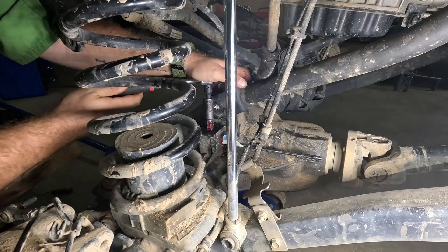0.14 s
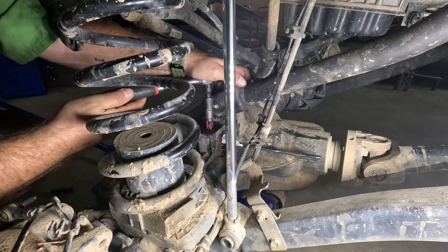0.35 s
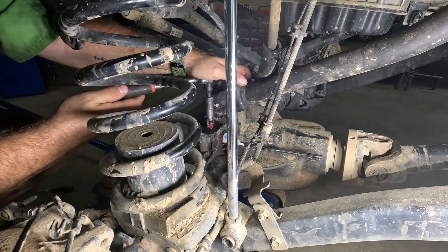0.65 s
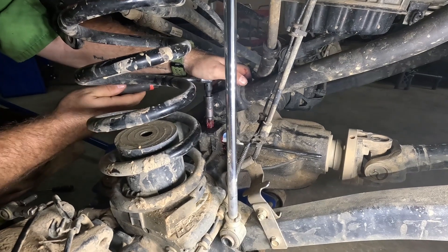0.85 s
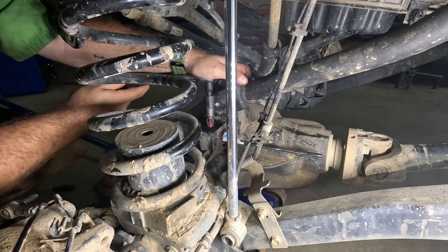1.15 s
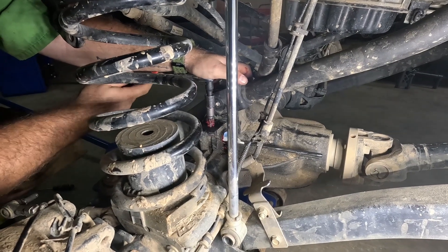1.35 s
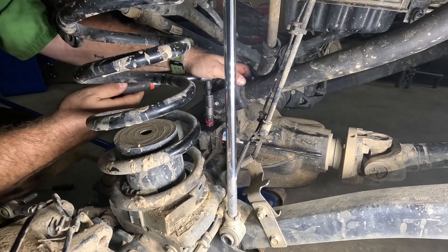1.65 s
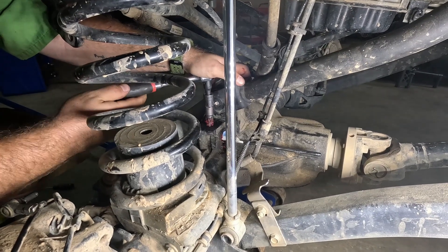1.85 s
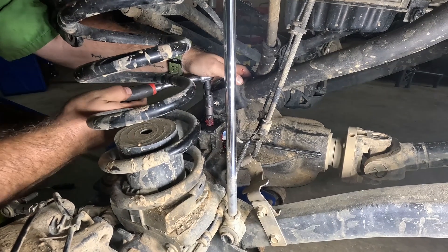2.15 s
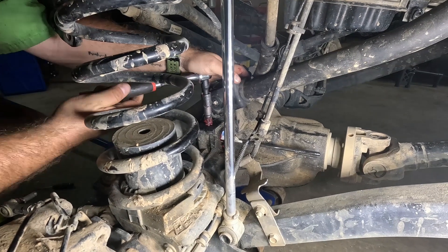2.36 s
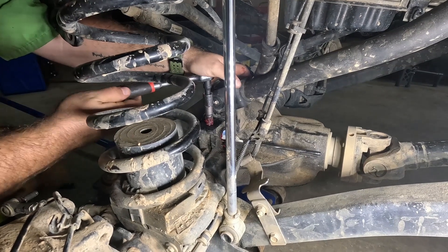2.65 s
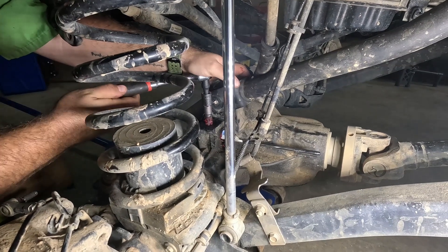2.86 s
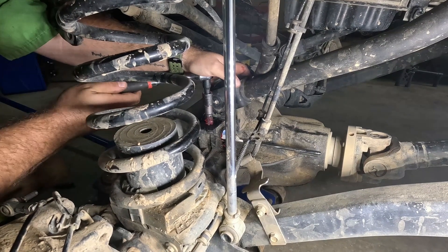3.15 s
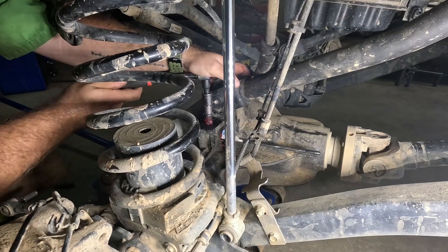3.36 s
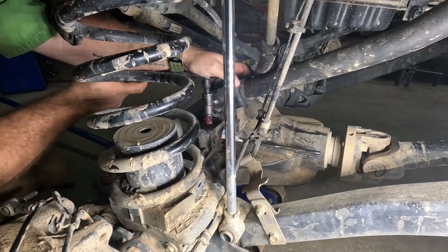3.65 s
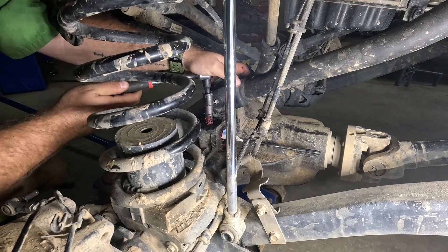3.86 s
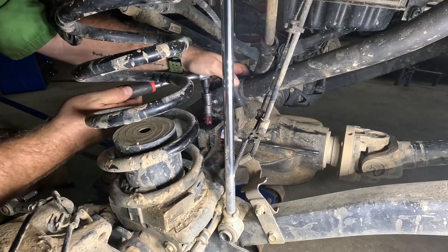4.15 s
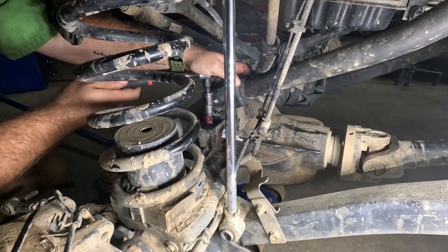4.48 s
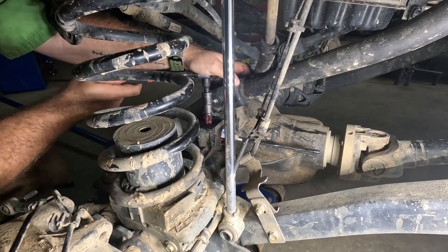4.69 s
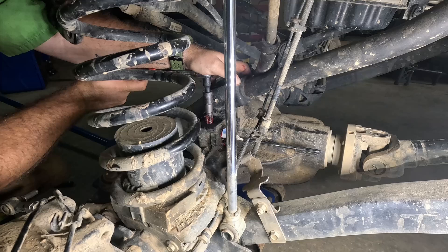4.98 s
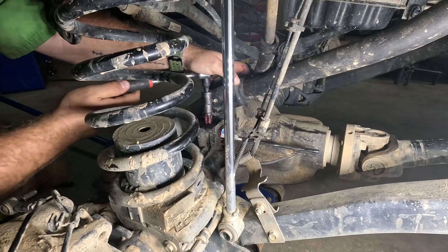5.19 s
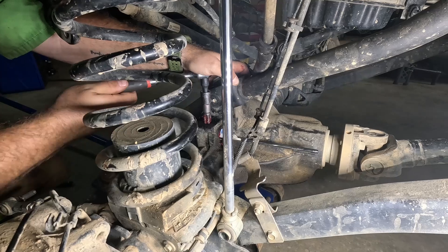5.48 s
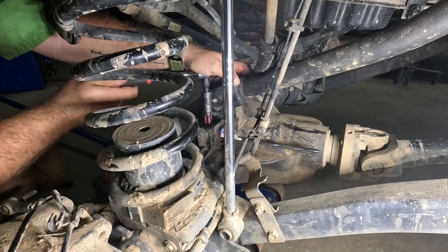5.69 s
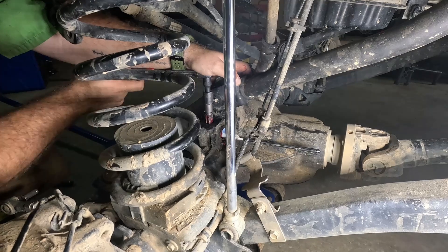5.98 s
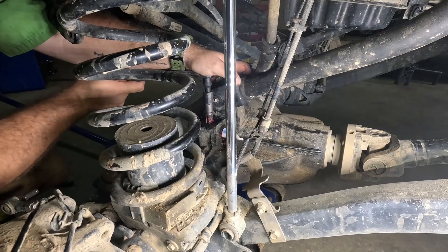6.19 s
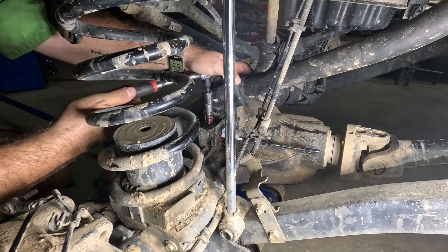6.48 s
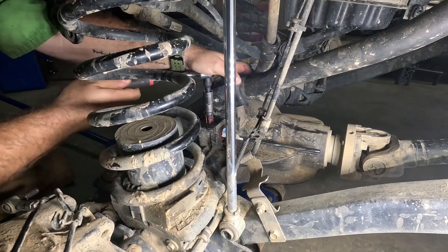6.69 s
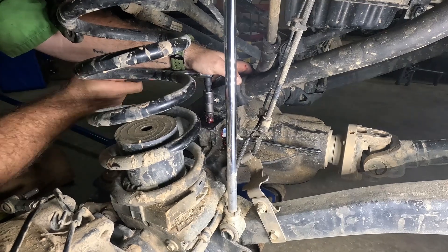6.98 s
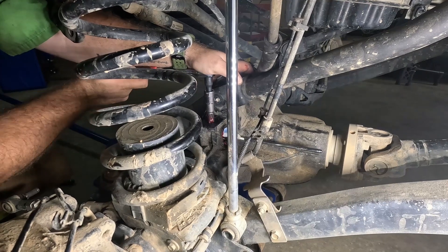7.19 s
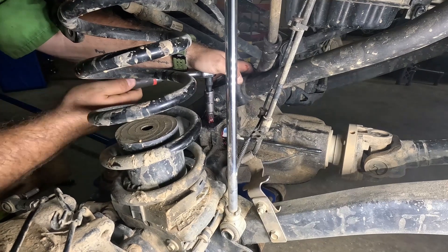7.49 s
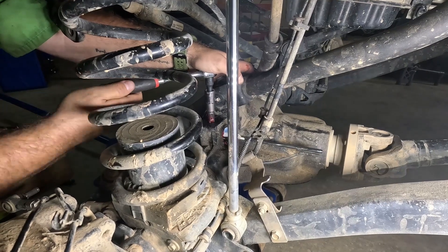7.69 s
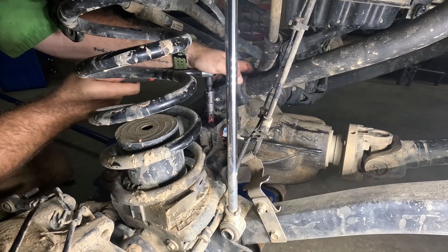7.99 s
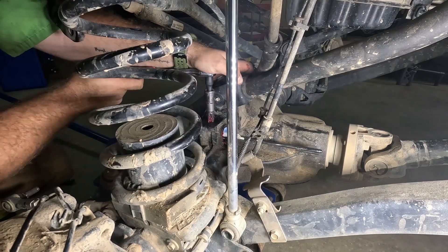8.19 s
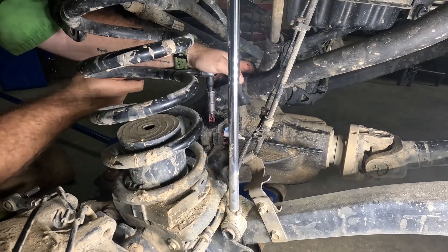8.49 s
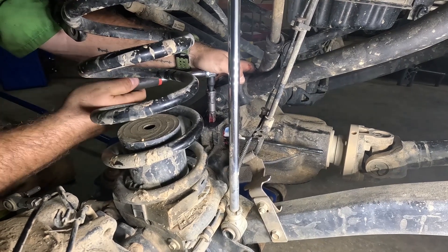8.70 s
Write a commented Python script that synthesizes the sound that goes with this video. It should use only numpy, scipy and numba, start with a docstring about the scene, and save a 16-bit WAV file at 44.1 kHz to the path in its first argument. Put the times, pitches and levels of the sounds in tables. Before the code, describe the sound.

Sharp, dry steel clicks run in bursts of five to seven, each lasting a fraction of a second, as a ratchet is swung back. Between bursts the cutting tool hisses softly with barely audible thin squeaks, joints knock, and hands rustle. A rough handle scrape interrupts the long gap after the second burst. The microphone is near, in stereo, with modest garage reverberation, steady faint hiss and drifting low rumble.

```python
"""In a quiet garage, under a vehicle, a ratchet wrench on a long extension turns a thread tap.
On back strokes the pawl drags over the gear teeth and drops off with clicks: ringing steel plus noise.
Slack joints knock softly, the socket taps the frame; the cutting tap hisses in noise bands, with thin squeaks.
Hands rustle and bump in grainy noise, and the handle scrapes once. The walls return a diffuse tail.
Air hiss, rumble and far machinery are filtered noise that drifts in level."""
import sys
import numpy as np
from scipy import signal
from scipy.fft import rfft, irfft
from scipy.io import wavfile
from scipy.ndimage import uniform_filter1d
from numba import njit

SR = 44100
rng = np.random.default_rng(int(sys.argv[2]) if len(sys.argv) > 2 else 0)


def digitize_waveform(pressure):
    """Quantize a signal to 16-bit integers and store it at the path in sys.argv[1].

    Rows of a 2-D input are taken as channels; values are limited to [-1, 1].
    """
    field = np.atleast_2d(pressure).T
    bounded = np.clip(field, -1, 1)
    quanta = np.round(bounded * 32767).astype(np.int16)
    wavfile.write(sys.argv[1], SR, quanta)


N = 389844

# Pawl dropping off a tooth. Each row: start in seconds, level in dB, boost of the low ring of the
# extension shaft in dB, boost of the high ring of the head in dB, rebound level in dB.
PAWL_CLICKS = [(0.158, -28, 2.5, 5.5, -19), (0.187, -27, 2, 5.5, -8.5), (0.2186, -25.5, 2, 8.5, -12),
               (0.2546, -29, 6.5, 3.5, -11), (0.2958, -30, 10, 8, -8), (0.3424, -28, 12, 11, -6),
               (0.388, -26, 0.5, 5.5, -23), (1.5637, -27, 5, 6.5, -22), (1.5994, -28, 2.5, 3, -8.5),
               (1.6371, -26, 2, 7.5, -12), (1.6931, -30.5, 6.5, 6, -14), (1.7548, -29, 6.5, 2.5, -10),
               (1.8445, -29.5, 3, 9.5, -21), (3.8096, -34.5, 15.5, 10, -16), (3.819, -26.5, 9.5, 14, -21),
               (3.8739, -26.5, 2.5, 3, -27), (3.901, -27, 6.5, 9.5, -21), (3.9375, -27.5, 6.5, 10.5, -28),
               (3.9821, -29, 5, 8.5, -12), (4.0299, -26, 7.5, 13.5, -19), (5.1291, -29.5, 16.5, 14.5, -3.5),
               (5.1815, -27, 9.5, 10.5, -18), (5.209, -28, 10.5, 11.5, -8), (5.2344, -26.5, -2, 7.5, -21),
               (5.2622, -29, 8, 7.5, -13), (5.2944, -29, 11.5, 11.5, -11), (5.3348, -32, 8, 7, -25),
               (6.298, -43, 4, 11, -20), (6.341, -29, 9.5, 10, -8), (6.366, -26.5, 9.5, 13, -14),
               (6.3897, -26, 7.5, 10, -25), (6.4132, -28.5, 6.5, 7.5, -12), (6.44, -26.5, 8.5, 8.5, -22),
               (6.4767, -28, 12.5, 9.5, -25), (7.422, -42.5, 19, 6, -11), (7.4644, -30, 10, 10.5, -16),
               (7.4898, -29, 10, 9.5, -7), (7.5176, -27, 7, 8.5, -20), (7.5469, -28.5, 9, 9, -10),
               (7.5793, -25.5, 8.5, 11, -19), (7.6132, -42.5, 10, 14, -14), (8.5606, -39, 6, 6, -20),
               (8.6034, -29, 12.5, 6.5, -13), (8.625, -28, 11, 10, -11), (8.6457, -27.5, 15, 14.5, -18),
               (8.6688, -26.5, 10.5, 10, -25), (8.6927, -25.5, 12, 9, -28), (8.7275, -36.5, 20, 12.5, -17)]
# Back strokes, the pawl dragging up the tooth flanks between clicks. Each row: start in seconds,
# length in seconds, drag level in dB, extra crispness of the stroke's clicks in dB.
BACK_STROKES = [(0.128, 0.34, -63, -0.5), (1.53, 0.38, -65.5, 1), (3.775, 0.36, -66, -1.5),
                (5.103, 0.25, -56.5, 3), (6.27, 0.19, -57.5, 0), (7.404, 0.33, -67, 0.5),
                (8.536, 0.24, -63, 1.5)]
# Ringing of the wrench and extension. Each row: pitch in Hz, strength in dB,
# time to fade by 60 dB in seconds (before the damping of each blow).
STEEL_MODES = [(1045, -39, 0.1), (1318, -26.5, 0.11), (1585, -23, 0.085), (1820, -20.5, 0.089),
               (2144, -20, 0.072), (2574, -20, 0.11), (2955, -9.5, 0.089), (3305, 6, 0.03),
               (3518, 1, 0.044), (3763, 5, 0.019), (4274, -3.5, 0.045), (4536, -5, 0.058), (5133, 0, 0.044),
               (5430, -3, 0.021), (5845, -9, 0.048), (6270, -5, 0.048), (7147, -1, 0.036),
               (7476, 1.5, 0.019), (7570, -4.5, 0.015), (8740, -8, 0.024), (8760, -9, 0.042),
               (9370, -9.5, 0.058), (10160, -10.5, 0.054), (11960, -16, 0.031), (13600, -18, 0.019)]
# Spectrum of the rattle of small parts. Each row: frequency in Hz, relative level in dB per Hz.
RATTLE_SPECTRUM = [(500, -46), (1000, -37), (1600, -22.5), (2600, -14.5), (3500, 5), (4400, -1.5),
                   (5300, 3), (6300, -10.5), (7200, -1), (8600, -18.5), (10200, -14.5), (12000, -21),
                   (16000, -42.5)]
# Slack in the joints taken up. Each row: start in seconds, level in dB, brightest frequency in Hz,
# damping as a factor, left minus right in dB.
JOINT_KNOCKS = [(0.0962, -53.5, 1340, 0.56, -2), (0.109, -53.5, 1420, 1.4, 1), (0.588, -60.5, 2860, 1.2, 2),
                (0.6683, -64.5, 1330, 1.8, 7), (1.4683, -56.5, 3800, 0.2, 0), (1.4903, -59, 1020, 0.48, -1),
                (2.1962, -53, 6140, 2.3, 1), (2.3037, -64, 2900, 1.3, 9), (2.4287, -52.5, 2800, 1.7, 14),
                (2.5566, -50, 3530, 1.2, 4), (2.7226, -58, 1630, 1.7, 7), (4.07, -51, 4500, 1.7, 2),
                (4.2246, -56.5, 3100, 0.78, 0), (4.247, -60, 5000, 1.5, 2.5), (4.9184, -64, 3020, 0.49, 3),
                (5.0962, -58.5, 1780, 1.5, 2), (5.4828, -60.5, 1920, 0.24, 0),
                (5.519, -52.5, 5650, 1.9, -1), (5.5597, -52.5, 2050, 1.04, 0), (6.2507, -60, 3500, 1.5, 4),
                (6.7403, -61, 1620, 0.58, 0), (7.3762, -58.5, 1860, 0.65, -1), (7.7686, -55, 2100, 0.27, 0),
                (8.531, -66, 1310, 1.1, 0)]
KNOCK_OCTAVES = 0.92  # spread of the steel that a knock wakes: 6 dB down this far from the brightest
# Socket tapping the frame beside the hole. Each row: start in seconds, level in dB,
# boost of the low ring in dB, left minus right in dB.
SOCKET_TAPS = [(2.687, -42, 9, 2), (2.789, -62, 18, 3), (3.0976, -47, 17.5, -1), (7.667, -47, 11, 1),
               (8.0055, -51.5, 8.5, 0), (8.403, -58, 1, 4), (8.573, -52, 25, 4)]
# Ringing of the frame. Each row: pitch in Hz, strength in dB,
# time to fade by 60 dB in seconds (before the damping of each blow).
FRAME_MODES = [(1143, -23, 0.33), (1305, -15, 0.23), (1624, -16.5, 0.23), (2172, -13.5, 0.19),
               (2624, 3, 0.14), (2926, 12.5, 0.061), (3660, -6, 0.057), (4260, -11, 0.28)]
# The two microphone ports, level. Each row: frequency in Hz, left minus right in dB.
PORT_LEVEL = [(60, -1.5), (110, -1.0), (200, -1.5), (380, -2.5), (700, -2.5), (1290, 0.5), (2380, -1.0),
              (4400, 0.0), (8120, 2.0), (15000, 3.0)]
# The two microphone ports, timing. Each row: frequency in Hz, lead of the left in radians.
# On the log axis of read(), the second row's value also holds below it.
PORT_LEAD = [(0, 0), (1640, -0.5), (2150, -0.2), (3010, -0.6), (4310, -0.3), (6890, -0.3), (7490, -0.5),
             (7920, -0.3), (10800, -0.2), (11700, 0.1), (12300, -0.0), (13300, 0.1), (15400, 0.3),
             (16200, -2.8)]
# Hissing bites of the cutting tap, and faint thin squeaks (the narrow rows). Each row: start in seconds,
# length in seconds, first centre in Hz, top centre in Hz, level at full size in dB, width at full size in Hz.
BITES_AND_SQUEAKS = [(1.007, 0.3, 3350, 4570, -59.5, 700), (1.28, 0.26, 3970, 4470, -61, 1000),
                     (2.64, 0.33, 4880, 4860, -77, 80), (3.624, 0.17, 4900, 4820, -76, 80),
                     (5.993, 0.3, 3460, 4440, -59.5, 596), (6.058, 0.052, 3100, 3120, -66, 500),
                     (7.174, 0.07, 3280, 3230, -73, 700), (7.685, 0.24, 4130, 4700, -58.5, 600),
                     (8.007, 0.3, 4660, 4830, -61.5, 600), (8.457, 0.063, 2140, 2120, -78, 60),
                     (8.74, 0.08, 2180, 2140, -75, 60), (8.81, 0.033, 2060, 2070, -63, 150)]
# Each of them swells while it glides, then eases off and narrows.
CLIMB_HZ_PER_S, SWELL_S = 11400, 0.028  # speed of the climb, shortest time to swell
START_DB, EASE_DB_PER_S = -15.5, -67  # start level against full size, change after it
NARROW_S = 0.27  # time after full size until the width has halved
THIN_HZ = 400  # bands narrower than this ease off more slowly
# Hands and sleeves shifting on the tool and frame. Each row: time of the peak in seconds,
# rustle level in dB, dull bump level in dB, fade time in seconds.
HAND_SHIFTS = [(0.1, -68.5, -69.5, 0.26), (0.27, -60.5, -82, 0.056), (0.59, -72, -71, 0.13),
               (1.62, -70.5, -76, 0.22), (1.91, -89, -75, 0.05), (2.12, -63.5, -66, 0.09),
               (2.235, -67, -68, 0.085), (2.35, -60.5, -67, 0.24), (2.56, -62, -67, 0.14),
               (2.75, -70, -75.5, 0.41), (3.08, -77, -77, 0.23), (3.54, -77, -74, 0.083),
               (3.81, -67.5, -70, 0.055), (5.13, -61.5, -62, 0.086), (5.6, -83, -68, 0.019),
               (6.3, -69, -74, 0.09), (6.82, -92, -75.5, 0.083), (7.0, -86, -74.5, 0.23),
               (7.375, -83, -72, 0.14), (7.62, -67, -80, 0.075), (7.8, -75, -71.5, 0.23),
               (8.23, -79.5, -79, 0.19), (8.56, -64.5, -69, 0.16)]
SHIFT_RISE_S = .025
REST_RUSTLE_DB, REST_BUMP_DB = -85.5, -79  # hands at rest
# Handle scraping on the suspension. Each row: time in seconds, level in dB,
# brightness in dB (how far the low half is turned down).
HANDLE_SCRAPE = [(2.28, -71, -13), (2.346, -59.5, 2), (2.378, -44.5, 1), (2.435, -52, 0), (2.476, -42, 0),
                 (2.528, -57.5, -6.5), (2.562, -57.5, -9), (2.584, -62.5, -5), (2.66, -61.5, -3)]
# Spectrum of the scrape. Each row: frequency in Hz, relative level in dB per Hz.
GRIT_SPECTRUM = [(410, -29), (700, -13), (816, -7.5), (1000, -18), (1380, -4), (1570, -2.5), (1950, -8),
                 (2940, -2.5), (4440, -3.5), (5040, -1), (6950, -6), (15000, -31)]
ROOM_T60_S, ROOM_DB = 0.89, -20.5  # time for the tail to fade by 60 dB, level of the tail
# Spectrum of the air hiss. Each row: frequency in Hz, relative level in dB per Hz.
AIR_SPECTRUM = [(300, -21), (500, -16), (900, -11), (1700, -17), (2500, -18.5), (2900, -13), (3300, -10),
                (4400, -8), (4800, -6), (7000, -0.5), (8500, -4), (10500, -4.5), (11200, -12),
                (15600, -17.5), (15900, -56)]
AIR_DB = -63.5  # level around which the hiss drifts
# Spectrum of the rumble. Each row: frequency in Hz, relative level in dB per Hz.
RUMBLE_SPECTRUM = [(8.8, -28), (15, 5.5), (43, 0.5), (110, -15), (140, -48), (240, -120)]
# Spectrum of far machinery. Each row: frequency in Hz, relative level in dB per Hz.
DRONE_SPECTRUM = [(90, -21), (125, -1.5), (151, 5), (175, 1.5), (230, -1.5), (300, -7.5), (450, -24),
                  (700, -38)]
# Levels around which the low room noise drifts. Each row: time in seconds, rumble in dB,
# far machinery in dB.
LOW_NOISE_LEVELS = [(0.0, -77, -67), (0.05, -58.5, -74), (0.19, -63, -61.5), (0.34, -66, -74.5),
                    (2.21, -62, -66), (2.85, -68.5, -73), (3.15, -56, -77), (3.37, -64, -71.5),
                    (3.86, -60.5, -70), (4.08, -52.5, -70.5), (4.36, -64, -68.5), (5.56, -60, -72.5),
                    (6.7, -63, -72), (6.92, -60.5, -68), (7.53, -66, -70.5), (7.63, -58.5, -76),
                    (8.32, -64, -69.5), (8.84, -64.5, -75.5)]
# How alike room noise is at left and right. Each row: frequency in Hz, likeness from 0 to 1.
ROOM_LIKENESS = [(30, 0.98), (250, 0.54), (1000, 0), (4000, 0.63), (12000, 0.54)]
TOP_HZ = 16500


def ratchet():
    """Hard pawl clicks, coloured tooth by tooth; the gripped handle damps them fast."""
    out = np.zeros((2, N))
    mode_hz, mode_db, _ = np.transpose(STEEL_MODES)[:, :, None]
    for s, db, shaft_db, head_db, bounce_db in PAWL_CLICKS:
        # crispness comes from the latest back stroke begun before the click
        crisp_db = [row[3] for row in BACK_STROKES if row[0] < s][-1]
        tint = [(2200, shaft_db), (3200, 0), (5500, 0.015),
                (6800, head_db), (10000, head_db), (13000, head_db + crisp_db)]
        rattle_db = lambda f: read(RATTLE_SPECTRUM, f) + read(tint, f)
        click = blow(STEEL_MODES, mode_db + read(tint, mode_hz), rattle_db, scatter_db=2.8, damping=1.19,
                     crack_db=6.3, crack_s=0.0026, rise_s=0.00045, bounce_db=bounce_db)
        add(out, click * undb(db), s)
    return out


def blow(table, ring_db, rattle_db, scatter_db, damping, crack_db, crack_s, rise_s, bounce_db):
    """One blow: modes in fresh strengths, a decaying rattle and a rebound; rms 1 over the first 4 ms."""
    t = np.arange(4096) / SR
    hz, _, t60 = np.transpose(table)[:, :, None]
    scatter, detune, phase, beat, lean = rng.standard_normal((5, len(table), 1))
    # every mode is a close pair, so it beats as it fades
    pair = 1 + .7 * np.cos(2 * np.pi * 70 * beat * t + 3.0 * detune)
    swing = np.sin(2 * np.pi * hz * (1 + 0.012 * detune) * t + 3.27 * phase)
    modes = undb(ring_db + scatter_db * scatter - 60 * damping * t / t60) * pair * swing
    ring = modes.sum(axis=0)

    rattle = colour(rng.standard_normal((2, len(t))), lambda f: undb(rattle_db(f)))
    # a fast fade with a weaker, slower one under it
    fade = np.exp(-t / crack_s) + 0.15 * np.exp(-t / (4.7 * crack_s))
    rattle *= undb(crack_db) * np.std(ring[:200]) * fade

    mid = ring + rattle[0]
    # each mode leans to its own side
    side = 0.19 * np.sum(lean * modes, axis=0) + 0.27 * rattle[1]
    both = np.array([mid + side, mid - side]) * np.minimum(t / rise_s, 1)
    late = int(SR * rng.uniform(.0035, .0055))
    both[:, late:] += undb(bounce_db) * both[:, :-late]
    return both / np.std(both[:, :int(.004 * SR)])


def drag():
    """Fine metal-on-metal scratching: grainy noise coloured like the rattle of the head, but flatter."""
    scratch = colour(grains(1.9, hold=80), lambda f: undb(0.49 * read(RATTLE_SPECTRUM, f)))
    t = np.arange(N) / SR
    size = sum(undb(db) * gate(t - s, length_s, 0.026) for s, length_s, db, _ in BACK_STROKES)
    return pan(scratch * size, 1.0)


def cutting():
    """Chips tear in wavering, gliding noise bands, each with a thinner squeal above; narrow bands squeak."""
    out, n = np.zeros((2, N)), SR // 2
    t = np.arange(n) / SR
    for s, length_s, first_hz, top_hz, db, width_hz in BITES_AND_SQUEAKS:
        swell_s = SWELL_S + max(top_hz - first_hz, 0) / CLIMB_HZ_PER_S
        swell = np.minimum(t / swell_s, 1)  # for a bite: the cut loading up
        since = np.maximum(t - swell_s, 0)  # seconds since full size
        ease_db = EASE_DB_PER_S * since * min(width_hz / THIN_HZ, 1)
        size_db = db + START_DB * (1 - swell) + ease_db
        hz = first_hz + (top_hz - first_hz) * swell + 0.053 * width_hz * walk(30, size=n)
        width = width_hz * (.5 + swell / 2) / (1 + since / NARROW_S)

        # dividing by the root of the width keeps the level even as the band narrows
        band = svf(svf(rng.standard_normal(n), hz, width), hz, width) / np.sqrt(width)
        squeal = svf(rng.standard_normal(n), hz + 0.68 * width, 0.13 * width) / np.sqrt(width)
        squeal_size = undb(-4 + 4.8 * walk(17, size=n))
        both = band / np.std(band) + squeal_size * squeal / np.std(squeal)
        size = undb(size_db + 1.0 * walk(57, size=n)) * gate(t, length_s, 0.016)
        add(out, pan(both * size, 1.0), s)
    return out


def taps():
    """Clean taps on the frame: a short bright mode over longer low ones."""
    out = np.zeros((2, N))
    mode_hz, mode_db, _ = np.transpose(FRAME_MODES)[:, :, None]
    # the rattle falls 20 dB per octave on both sides of 2800 Hz
    rattle_db = lambda f: -20.0 * np.abs(np.log2(np.maximum(f, 1) / 2800.))
    for s, db, low_db, pan_db in SOCKET_TAPS:
        ring_db = mode_db + low_db * (mode_hz < 2400)
        tapped = blow(FRAME_MODES, ring_db, rattle_db, scatter_db=1.5, damping=2.1,
                      crack_db=-4.0, crack_s=.004, rise_s=.0007, bounce_db=-9)
        add(out, pan(tapped * undb(db), pan_db), s)
    return out


def knocks():
    """Softer contacts that wake mainly one part of the steel, around a brightest frequency."""
    out, mode_hz = np.zeros((2, N)), np.array(STEEL_MODES)[:, :1]
    for s, db, hz, damping, pan_db in JOINT_KNOCKS:
        bell = lambda f: np.maximum(-6 * (np.log2(np.maximum(f, 1) / hz) / KNOCK_OCTAVES) ** 2, -70)
        knock = blow(STEEL_MODES, bell(mode_hz), bell, scatter_db=0.91, damping=damping,
                     crack_db=8.0, crack_s=.004 / damping, rise_s=0.00015, bounce_db=-8.0)
        add(out, pan(knock * undb(db), pan_db), s)
    return out


def ports(near):
    """Level and phase differ between the microphone ports with frequency."""
    f = np.fft.rfftfreq(N, 1 / SR)
    # half the difference goes to each side, in opposite directions
    half = undb(read(PORT_LEVEL, f) / 2) * np.exp(.5j * read(PORT_LEAD, f))
    return irfft(rfft(near) * np.array([half, 1 / half]), N)


def scrape():
    """The handle scrapes once: gritty noise whose level and brightness follow the table."""
    (scrape_db, bright_db), on = curve(HANDLE_SCRAPE)
    grit = colour(grains(2.4, hold=70), lambda f: undb(read(GRIT_SPECTRUM, f))) * undb(2.5 * walk(60))
    # a lighter touch thins the low half of the scrape
    low = signal.sosfilt(signal.butter(2, 3500, fs=SR, output="sos"), grit)
    balanced = grit - low + undb(-bright_db) * low
    soft_edges = uniform_filter1d(1. * on, 900)
    return pan(balanced * undb(scrape_db) * soft_edges, 3.8)


def hands():
    """Rustle of cloth and skin and dull bumps through the frame: grainy noise in two broad bands."""
    rustle_size, bump_size = shifting()
    # smooth humps around 1446 Hz and 160 Hz, their widths in octaves
    rustle_hump = lambda f: 1 / (1 + (np.log2(np.maximum(f, 1) / 1446.0) / 0.73) ** 4)
    bump_hump = lambda f: 1 / (1 + (np.log2(np.maximum(f, 1) / 160.0) / 1.77) ** 4)
    rustle = colour(grains(1.1, hold=200), rustle_hump)
    bumps = colour(grains(2.6, hold=600), bump_hump)
    return pan(rustle * rustle_size + bumps * bump_size, -6.0)


def shifting():
    """Sizes of rustle and bumps: each shift swells fast and fades at its own pace, over hands at rest."""
    t = np.arange(N) / SR
    power = undb([[REST_RUSTLE_DB], [REST_BUMP_DB]]) ** 2
    for s, rustle_db, bump_db, fade_s in HAND_SHIFTS:
        shape = np.exp(-2 * np.abs(t - s) / np.where(t < s, SHIFT_RISE_S, fade_s))
        power = power + undb([[rustle_db], [bump_db]]) ** 2 * shape
    return np.sqrt(power)


def garage(near):
    """Walls return a diffuse tail of every near sound: fading noise, duller at the top, half a second long."""
    t = np.arange(SR // 2) / SR
    tail = rng.standard_normal((2, len(t))) * undb(-60 * t / ROOM_T60_S) * np.minimum(t / 0.0043, 1)
    # dividing by the root of the length gives the tail a total energy of 1
    tail = colour(tail, lambda f: 1 / (1 + (f / 5200.0) ** 2)) / np.sqrt(len(t))
    return undb(ROOM_DB) * signal.fftconvolve(near.mean(axis=0)[None], tail, axes=1)[:, :N]


def air_hiss():
    """Steady hiss of air: wide noise whose level drifts gently."""
    return pan(wide(AIR_SPECTRUM) * undb(AIR_DB + 0.57 * walk(0.69)), 1.95)


def low_noise():
    """Rumble and far machinery: two wide low noises, each wavering around its own level curve."""
    (rumble_db, drone_db), _ = curve(LOW_NOISE_LEVELS)
    rumble = wide(RUMBLE_SPECTRUM) * undb(rumble_db + 2.1 * walk(12) + 2.5 * walk(3.5))
    drone = wide(DRONE_SPECTRUM) * undb(drone_db + 5.5 * walk(8.1))
    return pan(rumble + drone, -1.7)


def wide(spectrum):
    """Room noise of a spectrum, partly alike in both channels, at rms 1."""
    x = rfft(rng.standard_normal((2, N)))
    f = np.fft.rfftfreq(N, 1 / SR)
    like = np.clip(read(ROOM_LIKENESS, f), 0, 1)
    # more of the shared middle makes the channels more alike
    mid, side = x * undb(read(spectrum, f)) * np.sqrt([1 + like, 1 - like])
    both = irfft(np.array([mid + side, mid - side]), N)
    return both / np.std(both)


def undb(db):
    """Turn decibels into a plain factor."""
    return 10 ** (np.asarray(db) / 20)


def read(table, hz):
    """Value of a (Hz, value) table on a log-frequency axis."""
    at, value = np.transpose(table)
    return np.interp(np.log(np.maximum(hz, 1)), np.log(at), value)


def curve(table):
    """Columns of a time table at every sample, and whether each sample lies inside its span."""
    s, *columns = np.transpose(table)
    i = np.arange(N)
    inside = (i > s[0] * SR) & (i < s[-1] * SR)
    return [np.interp(i / SR, s, c) for c in columns], inside


def colour(x, gain):
    """Filter by a gain function of Hz, then set rms 1."""
    n = x.shape[-1]
    y = irfft(rfft(x) * gain(np.fft.rfftfreq(n, 1 / SR)), n)
    return y / np.sqrt(np.mean(y ** 2))


def walk(rate, size=N):
    """Wandering curve: random values held for 1 / rate seconds, then smoothed twice."""
    k = int(SR / rate)
    steps = np.repeat(rng.standard_normal(size // k + 1), k)
    return uniform_filter1d(uniform_filter1d(steps, k), k)[:size]


def grains(spread_db, hold):
    """Noise whose size jumps every hold samples, now and then far up."""
    jumps = np.minimum(rng.exponential(size=N // hold + 1), 4.0)
    return rng.standard_normal(N) * undb(spread_db * jumps.repeat(hold)[:N])


def gate(t, length_s, edge_s):
    """Open from t = 0 for length_s, with soft edges inside that time."""
    return np.clip(np.minimum(t, length_s - t) / edge_s, 0, 1)


def pan(x, db):
    """Place a sound so that the left is db stronger than the right."""
    return x * undb(np.array([[db], [-db]]) / 2)


def add(out, x, s):
    """Mix x into out from time s."""
    i = int(s * SR)
    out[:, i:i + x.shape[1]] += x[:, :N - i]


@njit
def svf(x, hz, width):
    """State-variable band-pass with a moving centre and width."""
    y, b, l = np.empty(len(x)), 0., 0.  # b and l: band and low-pass memories
    for i in range(len(x)):
        g, k = np.tan(np.pi * hz[i] / SR), width[i] / hz[i]
        v = (b + g * (x[i] - l)) / (1 + g * (g + k))
        b, l, y[i] = 2 * v - b, l + 2 * g * v, k * v
    return y


def scene():
    """Near sounds, their tail from the walls, and the room noise behind them."""
    steel = ports(ratchet() + knocks() + taps())
    near = steel + drag() + cutting() + scrape() + hands()
    return near + garage(near) + air_hiss() + low_noise()


def record(dry):
    """The recorder cuts the top: a steep low-pass filter."""
    return signal.sosfilt(signal.ellip(10, .2, 70, TOP_HZ, fs=SR, output="sos"), dry)


dry = scene()
out = record(dry)
digitize_waveform(out)
```